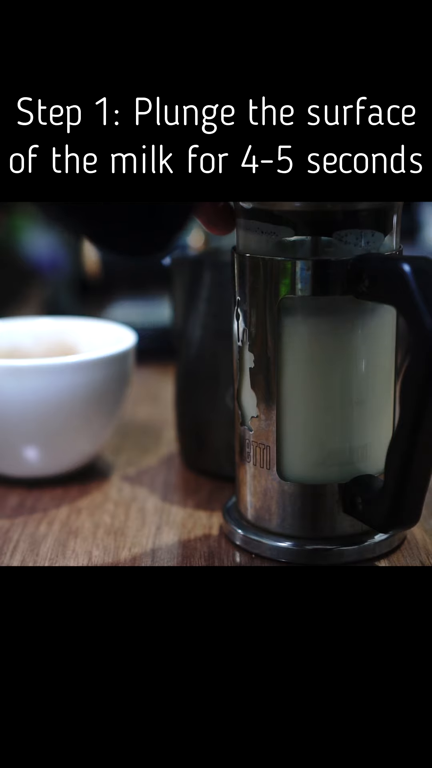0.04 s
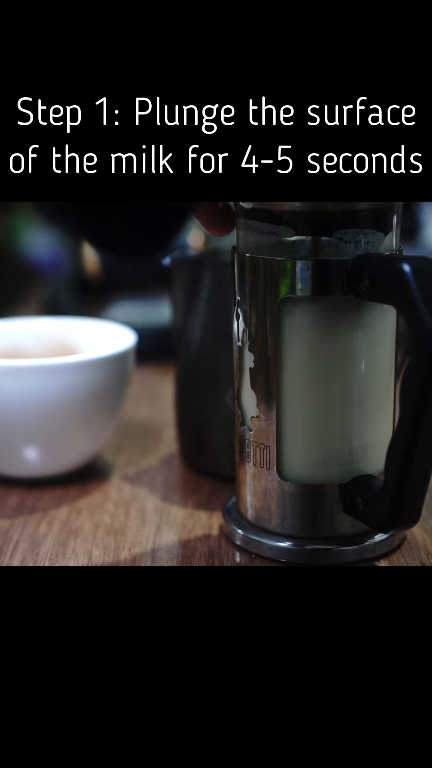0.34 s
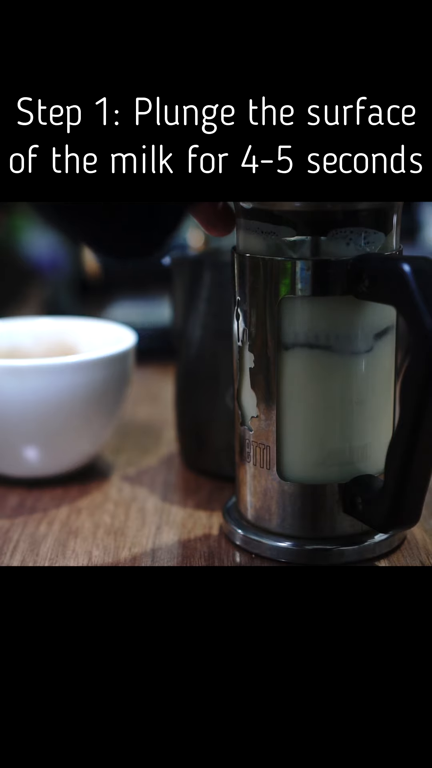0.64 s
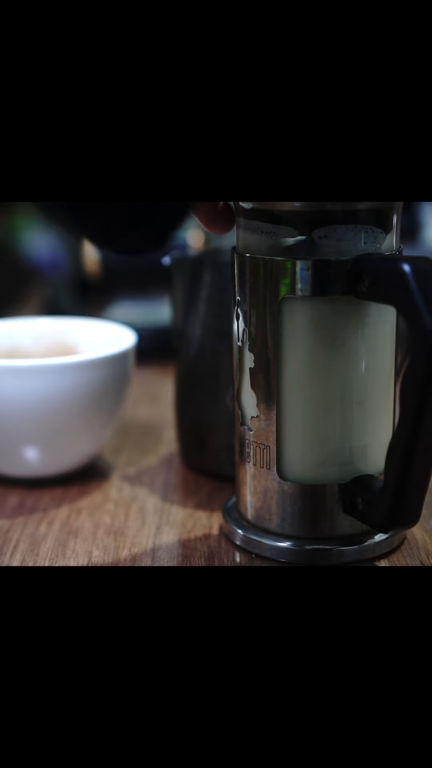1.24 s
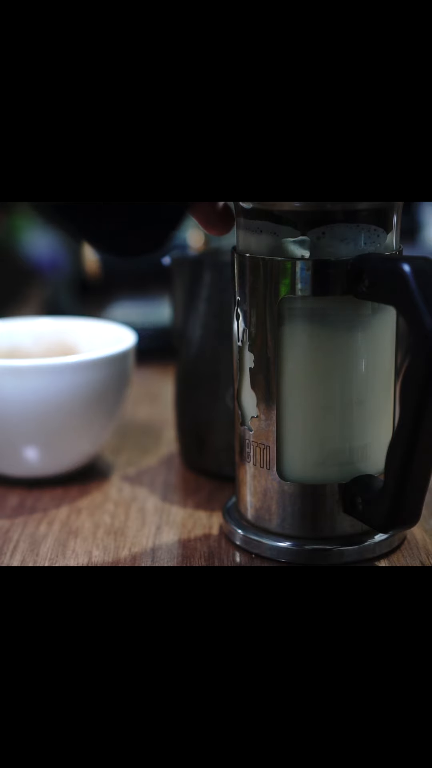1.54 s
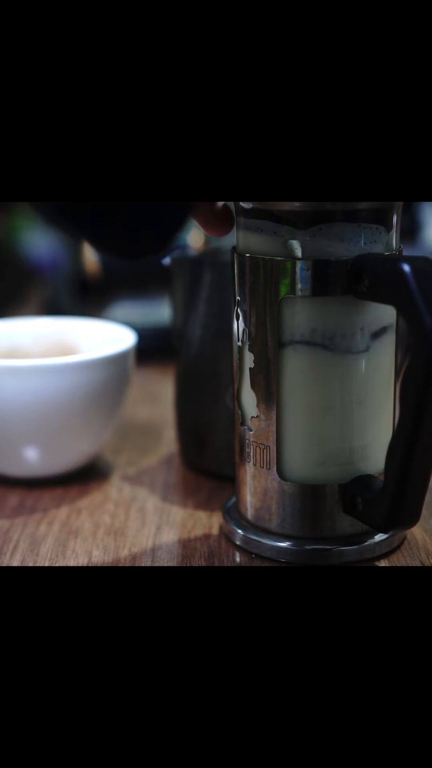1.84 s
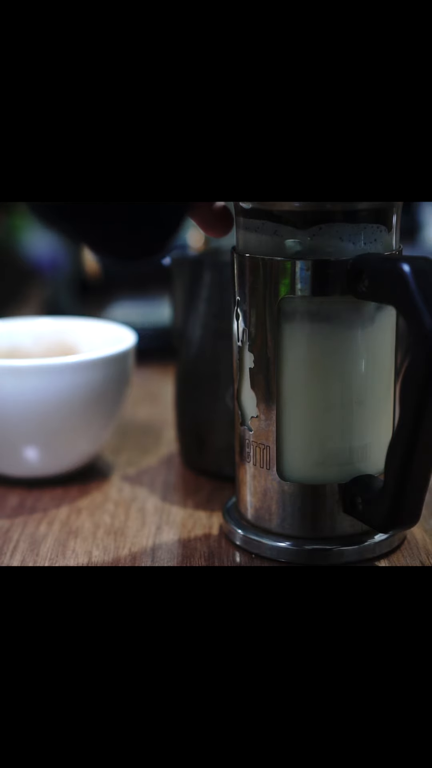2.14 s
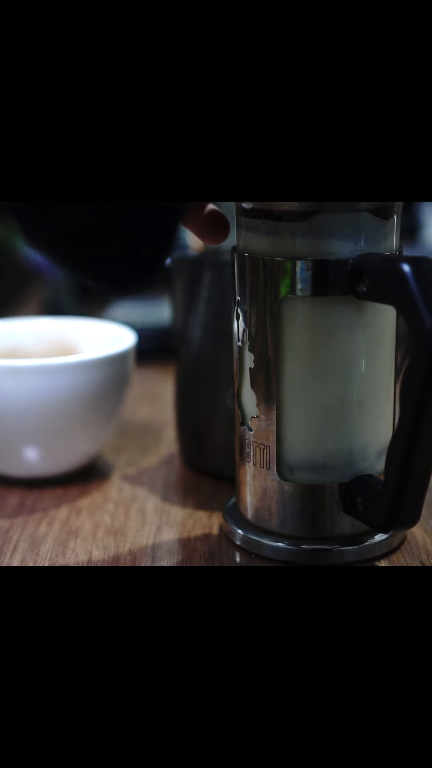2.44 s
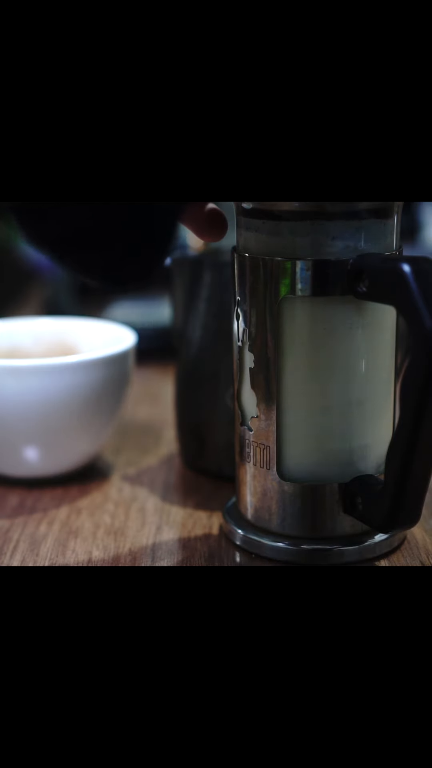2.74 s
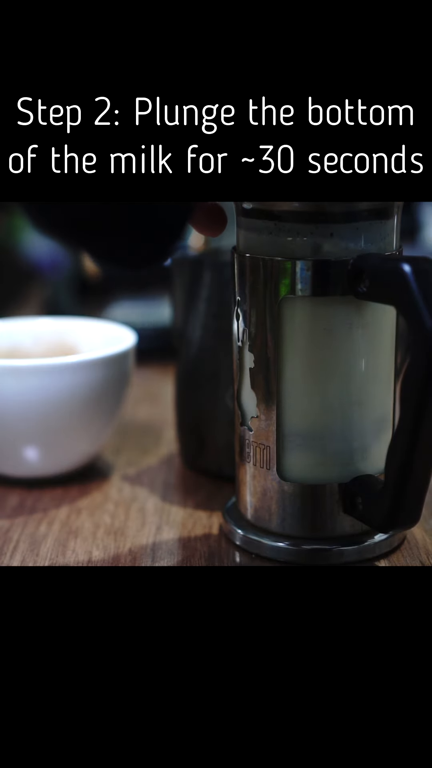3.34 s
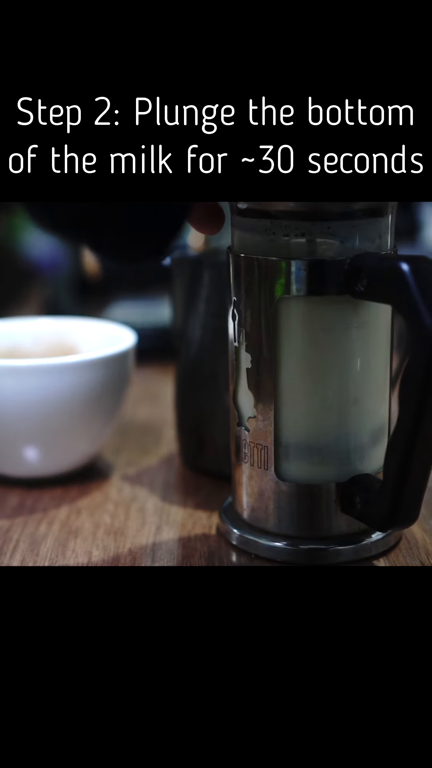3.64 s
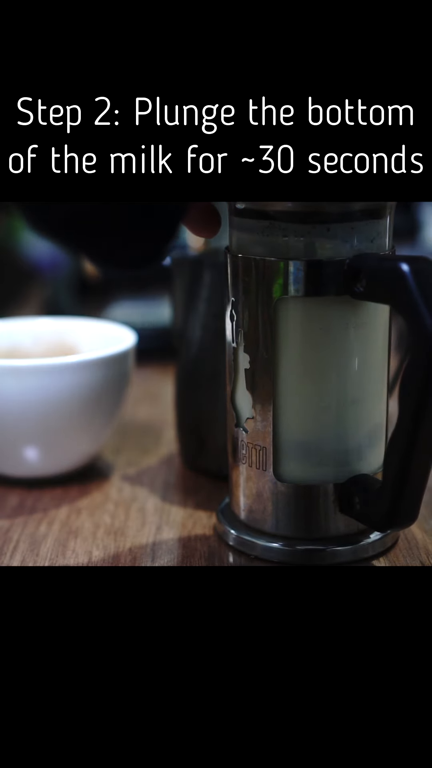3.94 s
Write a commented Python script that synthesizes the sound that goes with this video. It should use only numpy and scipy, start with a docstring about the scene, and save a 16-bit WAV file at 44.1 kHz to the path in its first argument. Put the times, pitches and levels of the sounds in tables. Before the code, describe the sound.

A plunger pumps milk in a glass press, sloshing, then knocks loudly on the bottom.

```python
"""A small room, the microphone close to a glass press of milk on a wooden table.
A mesh plunger is pumped: each stroke scrapes the glass, sloshes the milk and makes the foam fizz.
The wire rim catches with small ticks; pockets of air and foam gulp and squelch through the mesh.
Then the strokes go deep and the plunger knocks on the bottom six times, thumping the table and
overloading the recorder."""
import sys
import numpy as np
from scipy import signal
from scipy.fft import rfft, irfft
from scipy.io import wavfile
from scipy.ndimage import uniform_filter1d

SR = 44100
rng = np.random.default_rng(int(sys.argv[2]) if len(sys.argv) > 2 else 0)


def master(y):
    """Save y as 16-bit WAV."""
    cut = np.clip(np.atleast_2d(y).T, -1, 1)
    pcm = np.round(cut * 32767)  # scale
    wavfile.write(sys.argv[1], SR, pcm.astype(np.int16))


N = 176400

# Strokes, down and up in turn. Each row: middle in seconds, then scrape, slosh and fizz levels in dB.
STROKES = [(0.005, -40.5, -40, -63), (0.115, -45.5, -40.5, -54), (0.222, -44.5, -40, -53.5),
           (0.346, -42.5, -38, -55.5), (0.443, -44.5, -41, -55.5), (0.582, -40, -39, -51),
           (0.668, -43.5, -38, -53.5), (0.812, -47.5, -40, -55), (0.912, -50, -37.5, -52.5),
           (1.053, -38, -40, -50), (1.149, -43, -38.5, -54.5), (1.288, -47.5, -41.5, -53),
           (1.38, -47.5, -38, -54.5), (1.526, -36, -41.5, -52), (1.618, -45.5, -40.5, -56),
           (1.748, -38.5, -39.5, -54.5), (1.848, -45, -42, -54), (1.989, -36.5, -38.5, -55.5),
           (2.087, -40, -40.5, -60.5), (2.227, -34.5, -39.5, -60), (2.349, -36, -36.5, -51),
           (2.448, -42.5, -54, -51), (2.531, -42, -52, -80), (2.646, -34.5, -42, -46),
           (2.794, -38, -41, -42), (2.912, -34, -48, -43), (3.033, -34, -42.5, -44.5),
           (3.14, -30.5, -46, -43), (3.244, -35.5, -38, -44.5), (3.342, -37, -52, -46),
           (3.438, -33.5, -37, -47.5), (3.531, -34, -35.5, -48), (3.627, -32.5, -38, -48.5),
           (3.736, -30, -46, -50), (3.831, -34, -39.5, -47), (3.932, -30.5, -38, -49)]
# The plunger hits bottom. Each row: start in seconds, force in dB, clack and crack in dB on top of it.
KNOCKS = [(2.8291, 1, -3, -3), (3.0698, 0, -3, -4), (3.27, 1, -4.5, -4.5), (3.4741, -5, -6, -7),
          (3.6467, 3.5, -8, -1), (3.859, 3.5, -6.5, -2)]
# Soft bumps on the table and snags of the mesh. Each row: start in seconds, relative level in dB.
TABLE_BUMPS = [(2.495, -2), (3.39, -5)]
MESH_TICKS = [(0.06, -9.5), (0.1795, -1.5), (0.275, -3), (0.413, 1), (0.5152, -2), (0.6259, 9.5),
              (0.7159, 0.5), (0.855, 3), (0.9425, 2), (0.959, -5), (1.0986, -4.5), (1.309, -2),
              (1.3536, -4.5), (1.431, -1.5), (1.6106, 2), (1.8288, 6), (2.587, -5.5), (2.6705, -5),
              (2.937, -0.5), (3.057, 2), (3.444, 0)]
# Pockets passing through the mesh. Each row: start in seconds, pitch in Hz, level in dB.
AIR_POCKETS = [(.09, 408, -26), (.638, 383, -23), (1.13, 348, -24.5), (2.003, 490.5, -23.5),
               (2.247, 391, -17), (2.272, 205, -16.5)]
FOAM_POCKETS = [(0.456, 1950, -39), (.697, 2170, -35.5), (0.9408, 2130, -31), (1.392, 2180, -34),
                (1.513, 1100, -34)]
# Struck modes. Each row: frequency in Hz, relative level in dB, seconds to fall by 60 dB.
TABLE_MODES = [(113.2, -21.5, 0.49), (197, -5.5, 0.019), (216.3, -17.5, 0.15), (335, 7, 0.015),
               (309, -25.5, 0.32), (452, -17.5, 0.12), (549.3, -21.5, 0.18)]
PLUNGER_MODES = [(1053, -12.5, 0.03), (2113, 7.5, 0.01), (3970, -7.5, 0.012), (4710, -9, 0.012)]
MESH_MODES = [(1100, -11, 0.0095), (2330, -13, 0.019), (3980, -4, 0.0093), (5530, -12, 0.005)]
# Resonances of the scraped glass and of the press on the table, stirred by the milk.
# Each row: centre in Hz, width in Hz, relative level in dB.
GLASS_BANDS = [(2865, 59, 6), (1051, 139, 4.5)]
PRESS_BANDS = [(107.7, 6.6, 2.5), (207.4, 3.3, -6), (368, 26.4, -2)]
# Tone of each noise and of the room's tail. Each row: frequency in Hz, relative level in dB.
SCRAPE_SPECTRUM = [(300, -15), (1050, 12), (1330, -3.5), (1550, 1), (2200, 0.5), (3400, -19.5), (4100, -10),
                   (5000, -47), (9000, -23.5)]
FIZZ_SPECTRUM = [(1500, -18), (3500, 9), (5300, -8.5), (6600, 9), (7800, -0.5), (9800, 7), (15500, 1.5)]
SLOSH_SPECTRUM = [(25, -4), (60, -32), (108, 3.5), (400, 2), (560, -1), (750, -61)]
CRACK_SPECTRUM = [(500, 13.5), (5000, 0), (8000, -1.5), (10500, 1.5), (13000, -4)]
ROOM_SPECTRUM = [(50, 14), (105, 5.5), (400, -5.5), (620, 1.5), (1050, -1.5), (1450, -3), (2200, -4.5),
                 (3000, -1), (4100, -19), (5400, -4.5), (7500, -6), (9500, 1.5), (15000, -19)]
AIR_SPECTRUM = [(25, -18), (110, 26), (3000, -31), (15000, -35)]
# Stereo width at the microphone. Each row: frequency in Hz, side against mid in dB.
STEREO_WIDTH = [(90, 8.5), (220, -9), (520, -9), (1200, -12), (2600, -13), (4400, -0.5), (8000, 1)]
# Reflections off the near walls. Each row: delay in seconds, left gain, right gain.
WALL_ECHOES = [(.0045, 0.26, -0.13), (0.018, 0.13, -0.2), (.030, .04, -0.024)]

STROKE_S, STROKE_EDGE = 0.062, 2.1
DIVE_START_S, DIVE_LENGTH_S, DEEP_GLASS_DB = 2.6, 0.98, 0.5
SCRAPE_DB, GLASS_DB, FIZZ_DB, TICK_DB = -3, -4.5, 0.5, -29
BOOM_DB, GURGLE_DB, SPATTER_DB, POP_DB = -0.5, -5.5, -10, -20.5
BUBBLE_REF_HZ, BUBBLE_CYCLES, BUBBLE_RISE = 623, 26, 0.21  # life and pitch rise of a bubble this size
CRACK_DB, RATTLE_DB = 9.5, -4
THUMP_LAG_S, HARD_CONTACT_S, SOFT_CONTACT_S = 0.001158, 0.00066, 0.0092
SCRAPE_PAN_DB, MILK_PAN_DB, TICK_PAN_DB, KNOCK_PAN_DB = -4.5, -2.5, -10, -3
BASS_T60_S, TREBLE_T60_S, ROOM_ONSET_S = 0.44, 0.45, 0.006
ROOM_DB, PUMPING_SEND_DB, AIR_DB = 7.5, -2, -47


def mesh():
    """Close up, the rim scrapes and rings the glass while foam fizzes through the mesh."""
    scrape, _, fizz = stroke_gains()
    rub = undb(SCRAPE_DB) * unit(colour(crackle(per_s=3500, spread_db=2.0), SCRAPE_SPECTRUM))
    friction = crackle(per_s=2900, spread_db=2.2) * grip()
    glass = undb(GLASS_DB + DEEP_GLASS_DB * depth()) * resonate(friction, GLASS_BANDS)
    foam = undb(FIZZ_DB) * unit(colour(crackle(per_s=3800, spread_db=2.0), FIZZ_SPECTRUM))
    return pan(scrape * (rub * grip() + glass), SCRAPE_PAN_DB) + fizz * foam


def stroke_gains(stretch=1, lag_s=0):
    """Scrape, slosh and fizz gains: each stroke swells and dies with the plunger's speed."""
    t, power = np.arange(N) / SR - lag_s, np.zeros((3, N))
    length = STROKE_S * stretch
    for middle, *levels_db in STROKES:
        near = abs(t - middle) < 2 * length
        swell = np.exp(-abs(2 * (t[near] - middle) / length) ** STROKE_EDGE)
        power[:, near] += undb(levels_db)[:, None] ** 2 * swell
    return np.sqrt(power)


def grip(per_s=45, flutter_db=4):
    """The rim grips and lets go, so the level flutters."""
    hold = int(SR / per_s)
    steps = np.repeat(rng.standard_normal(N // hold + 1), hold)
    return undb(flutter_db * uniform_filter1d(steps, hold)[:N])


def depth():
    """0 while the mesh works at the surface, 1 when it is deep in the milk."""
    return np.clip((np.arange(N) / SR - DIVE_START_S) / DIVE_LENGTH_S, 0, 1)


def milk():
    """Churning milk booms in the press and traps bubbles; at the surface small ones spatter and pop."""
    _, slosh, _ = stroke_gains(stretch=1.33, lag_s=0.0016)
    churn = unit(colour(crackle(per_s=830, spread_db=3.0), SLOSH_SPECTRUM))
    boom = undb(BOOM_DB) * resonate(crackle(per_s=720, spread_db=3.0), PRESS_BANDS)
    gurgle = undb(GURGLE_DB) * bubbles(per_s=130, low_hz=182, high_hz=623)
    spatter = undb(SPATTER_DB) * bubbles(per_s=190, low_hz=795, high_hz=2740)
    pops = undb(POP_DB) * bubbles(per_s=420, low_hz=2970, high_hz=12650)
    froth = (1 - depth()) * (spatter + pops)
    return pan(slosh * (churn + boom + gurgle + froth), MILK_PAN_DB)


def bubbles(per_s, low_hz, high_hz, samples=N):
    """Bubbles of random size ring: large ones rise more in pitch, small ones last more cycles."""
    out = np.zeros((2, samples))
    for when, size, strength, side in rng.random((int(per_s * samples / SR), 4)):
        hz = high_hz * (low_hz / high_hz) ** size
        life = BUBBLE_CYCLES / np.sqrt(hz * BUBBLE_REF_HZ)
        rise = BUBBLE_RISE * min(BUBBLE_REF_HZ / hz, 1)
        t = np.arange(int(life * SR)) / SR
        tone = np.sin(2 * np.pi * hz * t * (1 + rise * t / life / 2)) * fade(t, life)
        gain = undb(44.3 * strength + 2 * size)
        add(out, when * samples / SR, pan(gain * tone, 10 * (side - .5)))
    return unit(out)


def knocks():
    """The plunger clacks and cracks on the bottom, then the press thumps the table; twice it just bumps."""
    out, t = np.zeros((2, N)), np.arange(SR // 2) / SR
    crack = colour(signal.unit_impulse(128, 16), CRACK_SPECTRUM)
    for start, force_db, clack_db, crack_db in KNOCKS:
        clack = ring(PLUNGER_MODES, t, detune=0.006, scatter_db=1.5)
        thump = soften(ring(TABLE_MODES, t, detune=0.0052), HARD_CONTACT_S)
        add(out, start, -undb(force_db + clack_db) * clack)
        add(out, start, undb(force_db + CRACK_DB + crack_db) * crack)
        add(out, start + THUMP_LAG_S, undb(force_db) * thump)
    for start, db in TABLE_BUMPS:
        add(out, start, undb(db) * soften(ring(TABLE_MODES, t), SOFT_CONTACT_S))
    low_cut = signal.butter(2, 133, "high", fs=SR, output="sos")
    return pan(signal.sosfilt(low_cut, out), KNOCK_PAN_DB)


def rattle():
    """The mesh buzzes for a few milliseconds at each knock."""
    out, t = np.zeros((2, N)), np.arange(SR // 20) / SR
    for start, force_db, _, crack_db in KNOCKS:
        grit = unit(colour(stereo_noise(len(t)), CRACK_SPECTRUM))
        add(out, start, undb(force_db + RATTLE_DB + crack_db) * grit * fade(t, t60=0.019))
    return out


def glugs(sag_per_s=0.9, attack_s=0.0079):
    """Large air pockets gulp through the mesh, ringing briefly with a sagging pitch."""
    out, t = np.zeros((2, N)), np.arange(SR // 10) / SR
    envelope = (1 - np.exp(-t / attack_s)) * fade(t, t60=0.1)
    for start, hz, db in AIR_POCKETS:
        tone = np.sin(2 * np.pi * hz * t * (1 - sag_per_s * t / 2))
        add(out, start, pan(undb(db) * tone * envelope, MILK_PAN_DB))
    return out


def squelches(pitch_span=1.35):
    """A squeezed pocket of foam collapses into a short swarm of bubbles of like size."""
    out, t = np.zeros((2, N)), np.arange(SR // 10) / SR
    for start, hz, db in FOAM_POCKETS:
        swarm = bubbles(per_s=1100, low_hz=hz / pitch_span, high_hz=hz * pitch_span, samples=len(t))
        add(out, start, undb(db) * swarm * fade(t, t60=0.066))
    return out


def ticks():
    """The wire rim snags on the glass and springs free, ringing to the right of the microphone."""
    out, t = np.zeros((2, N)), np.arange(SR // 20) / SR
    for start, db in MESH_TICKS:
        snap = soften(stereo_noise(len(t)) * fade(t, t60=0.026), seconds=.00007)
        wire = pan(ring(MESH_MODES, t, detune=0.024, scatter_db=1), TICK_PAN_DB)
        add(out, start, undb(TICK_DB + db) * (wire + undb(-4) * snap))
    return out


def room(x):
    """The near walls send a few dulled echoes back to the microphone, then a diffuse tail."""
    t = np.arange(SR * 3 // 4) / SR
    noise = undb(ROOM_DB) * colour(stereo_noise(len(t)), ROOM_SPECTRUM) / np.sqrt(len(t))
    bass = signal.sosfiltfilt(signal.butter(2, 900, fs=SR, output="sos"), noise)
    tail = bass * fade(t, BASS_T60_S) + (noise - bass) * fade(t, TREBLE_T60_S)
    tail *= 1 - np.exp(-(t / ROOM_ONSET_S) ** 2)
    out = signal.fftconvolve(x.mean(0)[None], tail, axes=1)[:, :N]
    for delay, left, right in WALL_ECHOES:
        add(out, delay, soften(x, seconds=0.00044) * np.array([[left], [right]]))
    return out


def room_tone():
    """Faint, low air noise behind everything."""
    return undb(AIR_DB) * unit(colour(stereo_noise(N), AIR_SPECTRUM))


def crackle(per_s, spread_db):
    """Dense tiny clicks of uneven size, in stereo."""
    size = undb(spread_db * np.minimum(rng.exponential(size=(2, N)), 4))
    clicks = size * rng.standard_normal((2, N)) * (rng.random((2, N)) < per_s / SR)
    return spread(*clicks)


def ring(modes, t, detune=0., scatter_db=0.):
    """Struck modes die away; detune and scatter make each blow a little different."""
    out = np.zeros(len(t))
    for hz, db, t60 in modes:
        gain = undb(db + scatter_db * rng.standard_normal())
        pitch = hz * (1 + detune * rng.standard_normal())
        out += gain * fade(t, t60) * np.sin(2 * np.pi * pitch * t)
    return out


def resonate(x, bands):
    """Drive a set of resonances; the sum has rms 1."""
    return unit(sum(undb(db) * unit(signal.lfilter(*signal.iirpeak(hz, hz / width, SR), x))
                    for hz, width, db in bands))


def soften(x, seconds):
    """Smear a sound in time and dull it, as a longer contact does to a blow."""
    pole = np.exp(-2 / (seconds * SR))
    return signal.lfilter([1 - pole], [1, -pole], x)


def colour(x, points):
    """Filter by a spectrum of (Hz, dB) points."""
    hz, db = np.array(points, float).T
    bins_hz = np.fft.rfftfreq(x.shape[-1], 1 / SR)
    gain = undb(np.interp(np.log(bins_hz + 1), np.log(hz), db))
    return irfft(rfft(x) * gain, x.shape[-1])


def spread(mid, side):
    """Two unrelated sounds become a stereo pair, wide in bass and treble, narrow between."""
    mid_share = [(hz, -10 * np.log10(1 + undb(db) ** 2)) for hz, db in STEREO_WIDTH]
    side_share = [(hz, db - 10 * np.log10(1 + undb(db) ** 2)) for hz, db in STEREO_WIDTH]
    return colour(mid, mid_share) + colour(side, side_share) * np.array([[1], [-1]])


def stereo_noise(samples):
    """White noise spread across the stereo pair."""
    return spread(*rng.standard_normal((2, samples)))


def pan(x, db):
    """Lean a sound to the left by db; negative leans right."""
    return x * undb(np.array([[db], [-db]]) / 2)


def fade(t, t60):
    """Exponential decay, 60 dB down after t60 seconds."""
    return np.exp(-np.log(1000) * t / t60)


def add(out, start, sound):
    """Mix a sound in at start seconds."""
    i = max(int(start * SR), 0)
    part = out[..., i:i + sound.shape[-1]]
    part += sound[..., :part.shape[-1]]


def undb(db):
    """Decibels to gain."""
    return 10 ** (np.asarray(db) / 20)


def unit(x):
    """Scale to rms 1."""
    return x / np.sqrt(np.mean(x ** 2))


def scene():
    """At the microphone: pumping and knocks up close, the small room behind them."""
    pumping = mesh() + milk() + glugs() + squelches() + ticks()
    blows = knocks()
    air = room_tone()
    return pumping + blows + rattle() + room(blows + undb(PUMPING_SEND_DB) * pumping) + air


def record(dry):
    """The knocks clip the recorder's input; the treble is rounded off, then cut steeply."""
    clipped = np.clip(0.94 * dry, -1, 1)
    rounded = signal.sosfilt(signal.butter(2, 13500, fs=SR, output="sos"), clipped)
    return signal.sosfilt(signal.ellip(8, .2, 70, 15600, fs=SR, output="sos"), rounded)


dry = scene()
out = record(dry)
master(out)
```